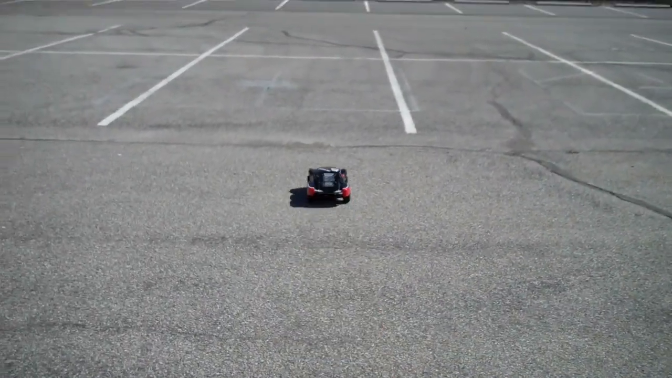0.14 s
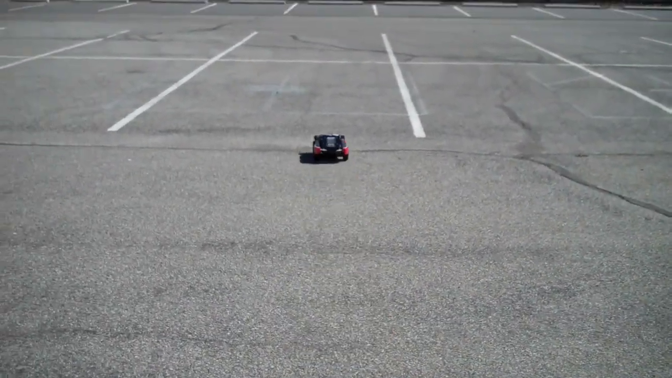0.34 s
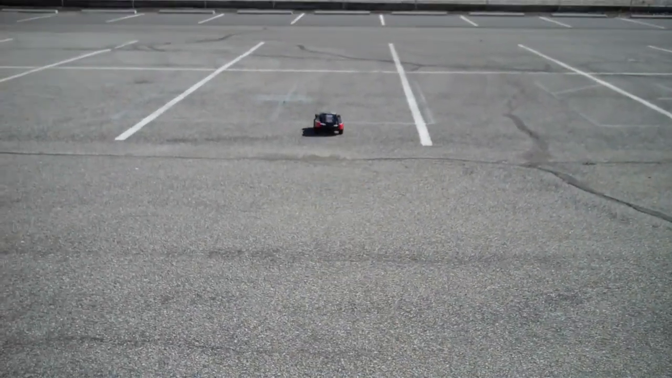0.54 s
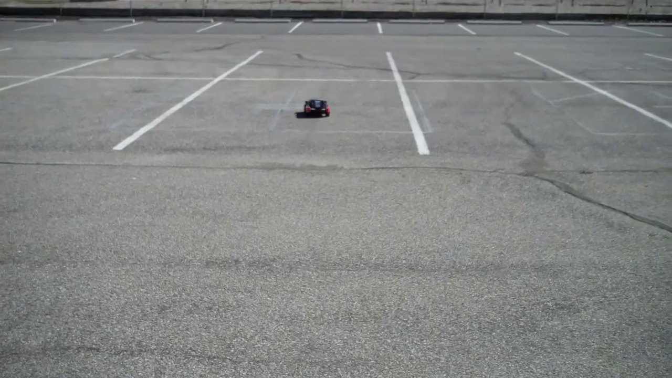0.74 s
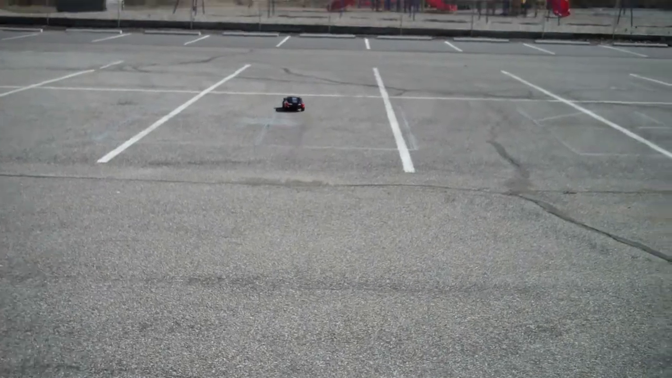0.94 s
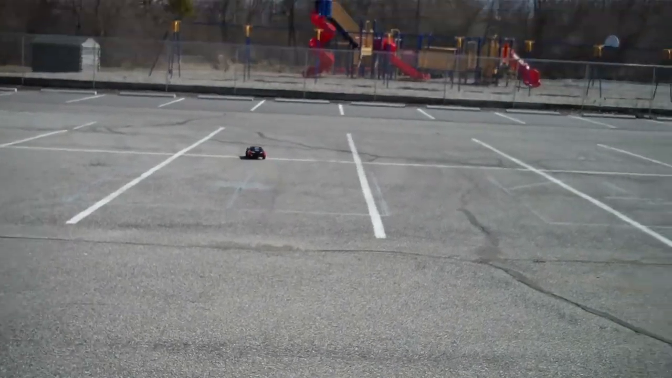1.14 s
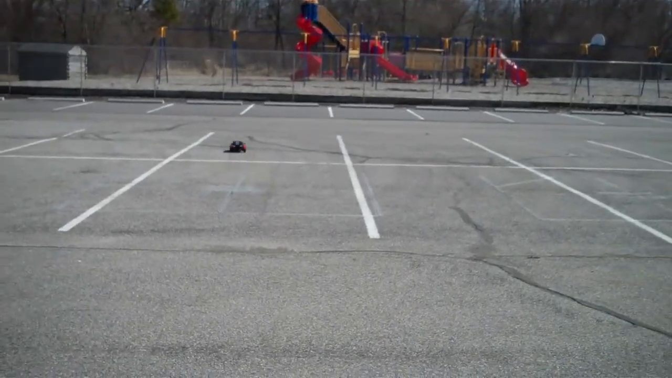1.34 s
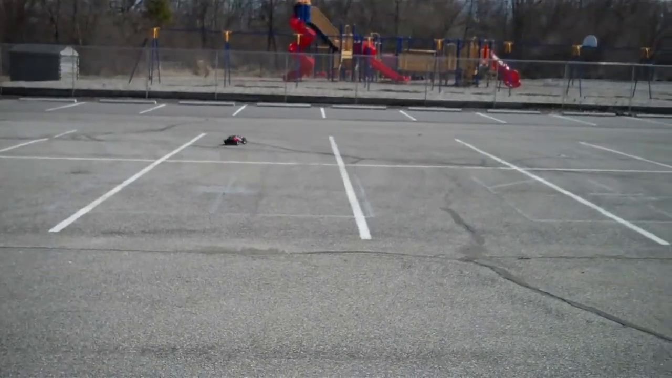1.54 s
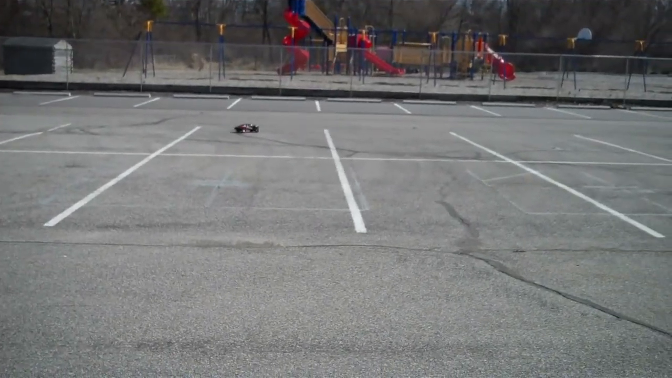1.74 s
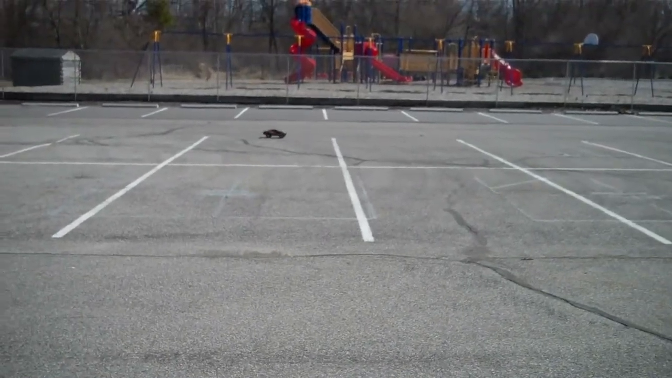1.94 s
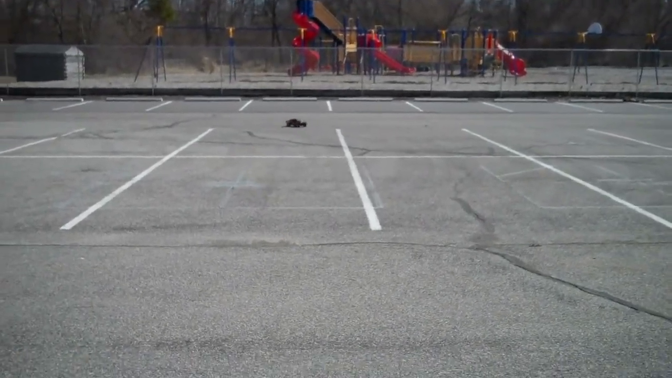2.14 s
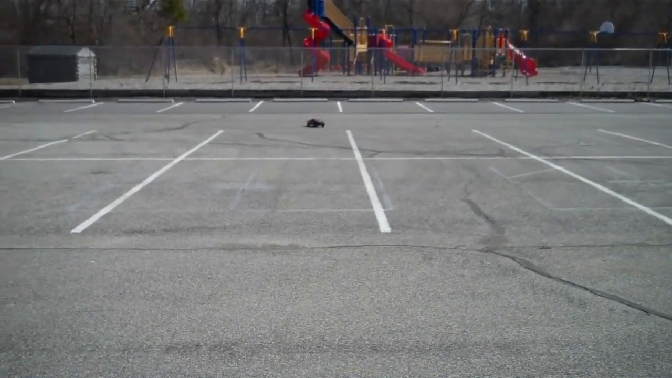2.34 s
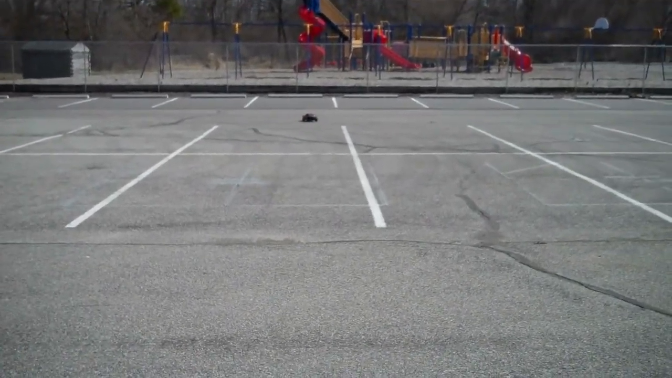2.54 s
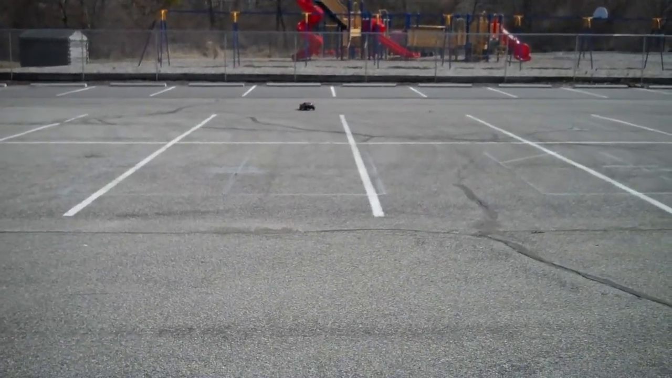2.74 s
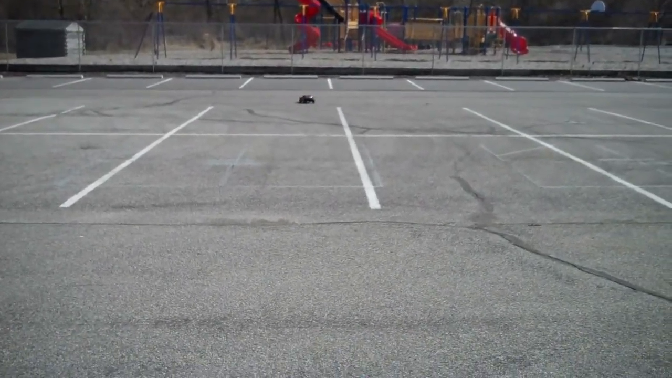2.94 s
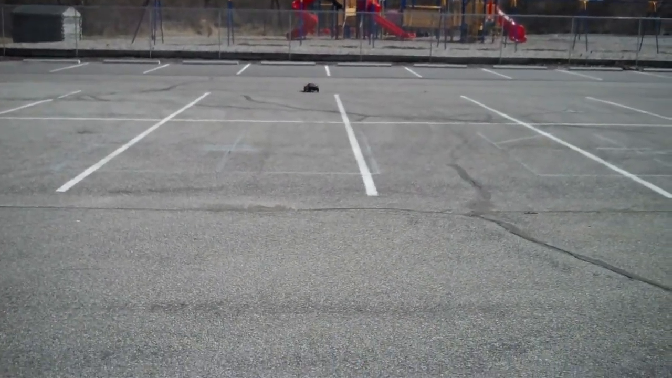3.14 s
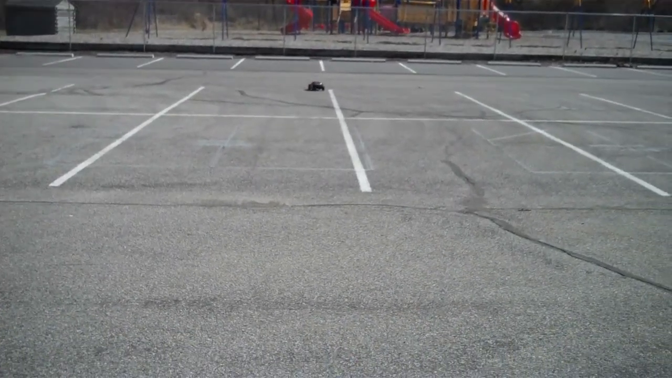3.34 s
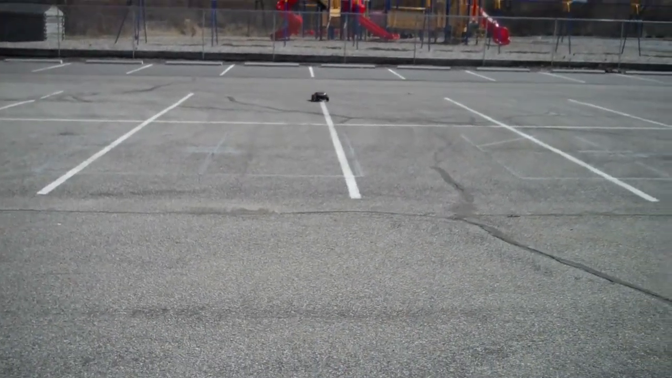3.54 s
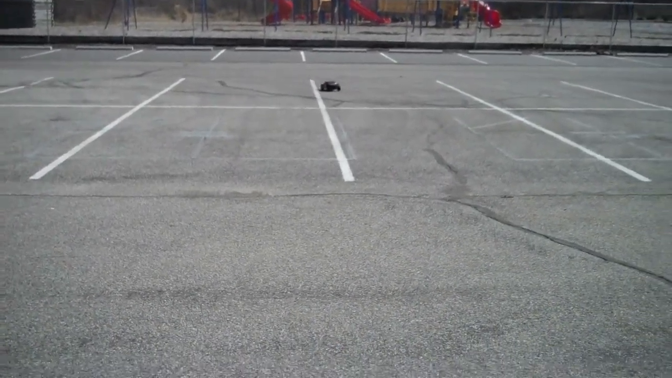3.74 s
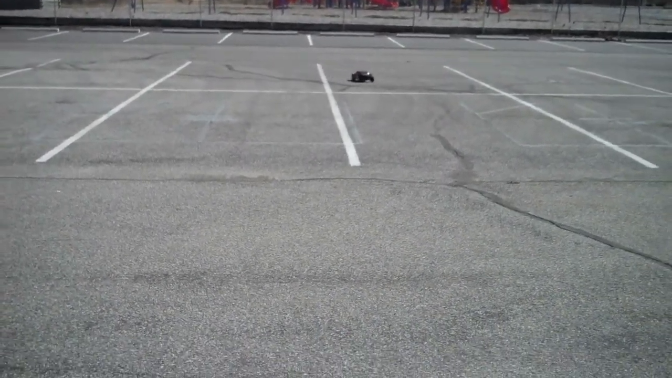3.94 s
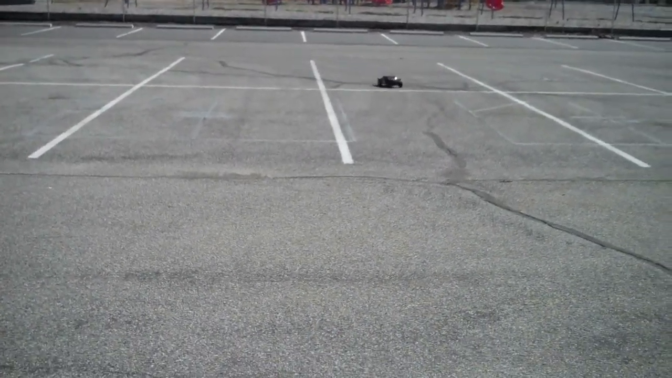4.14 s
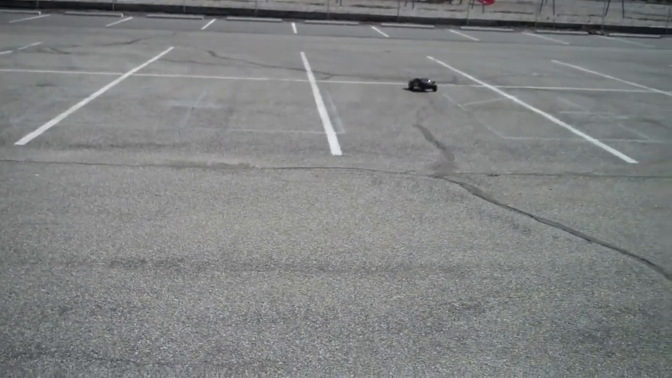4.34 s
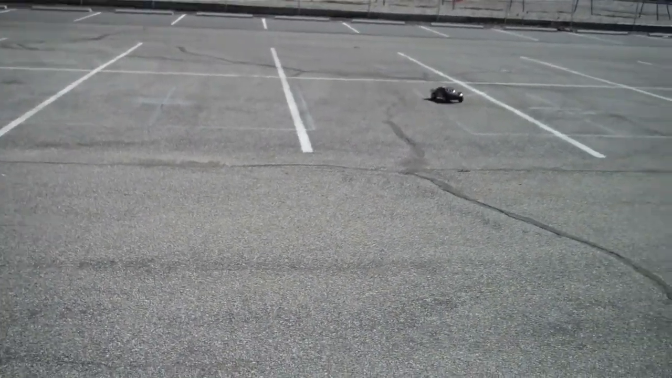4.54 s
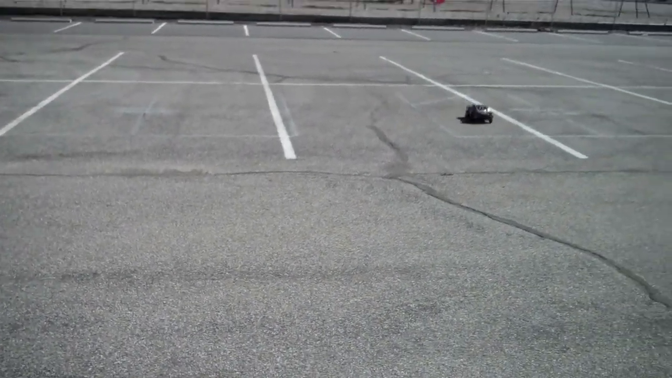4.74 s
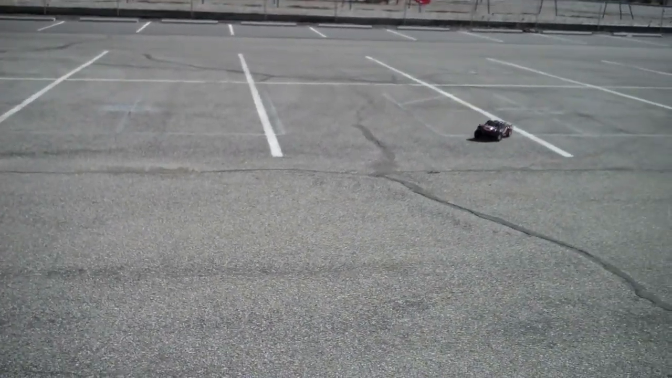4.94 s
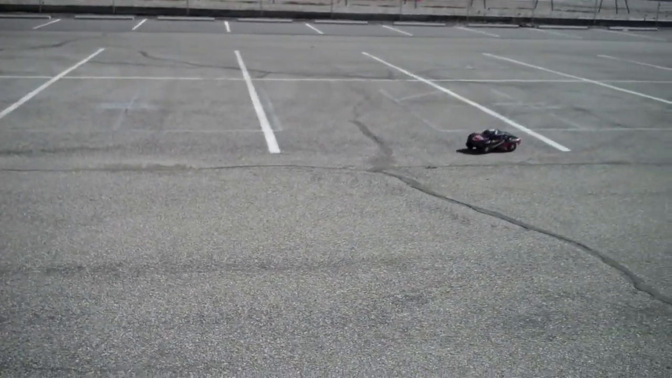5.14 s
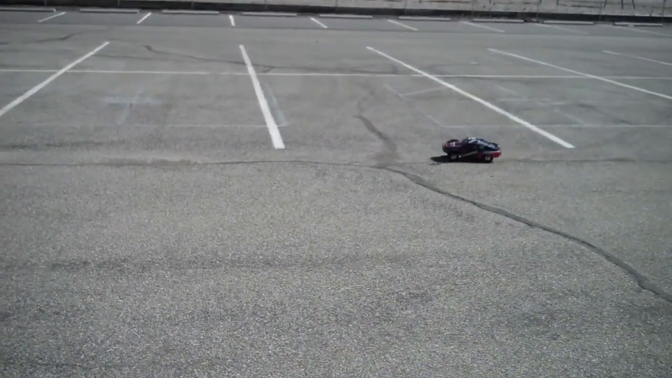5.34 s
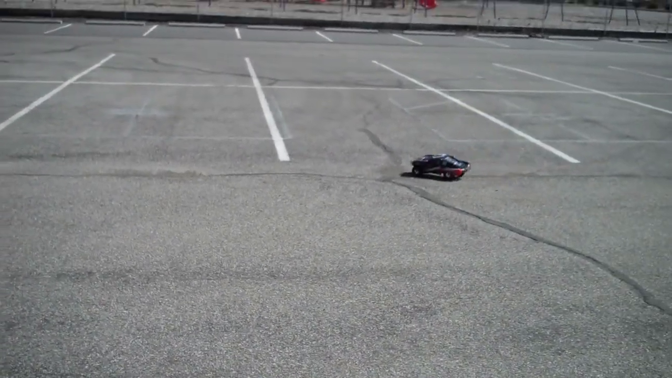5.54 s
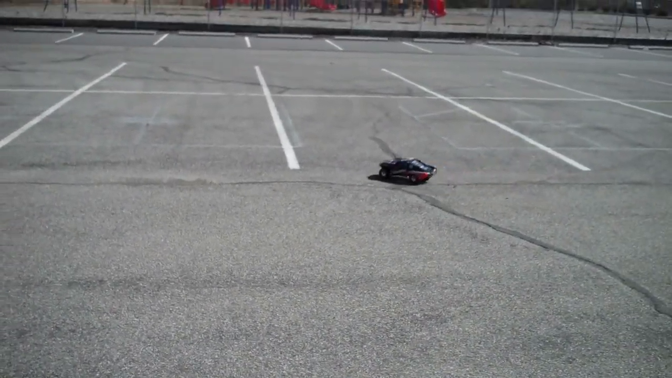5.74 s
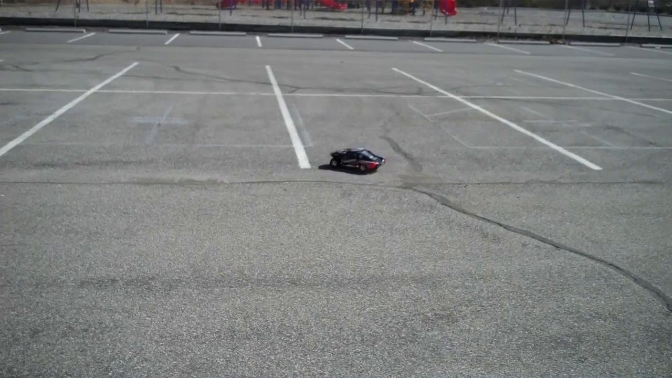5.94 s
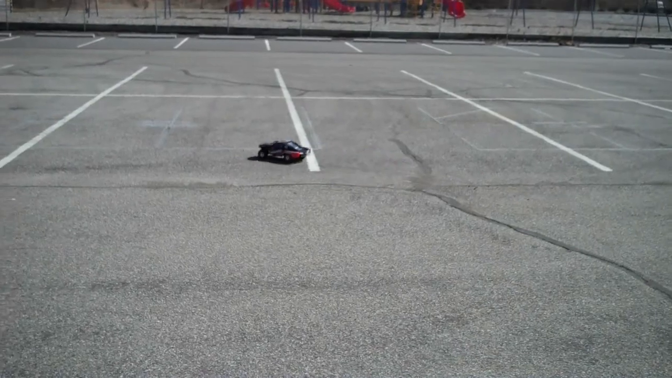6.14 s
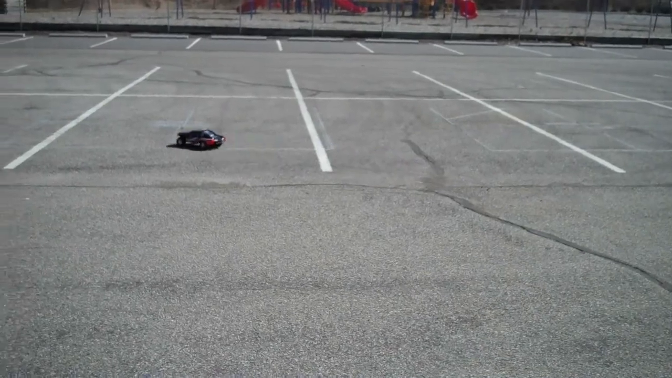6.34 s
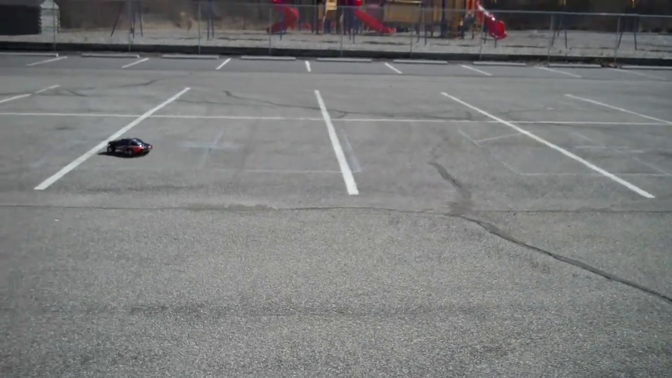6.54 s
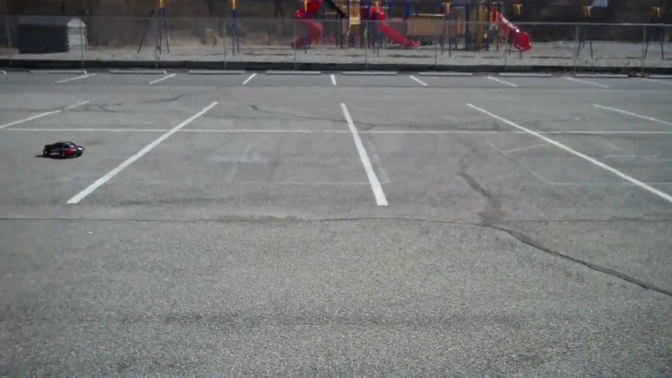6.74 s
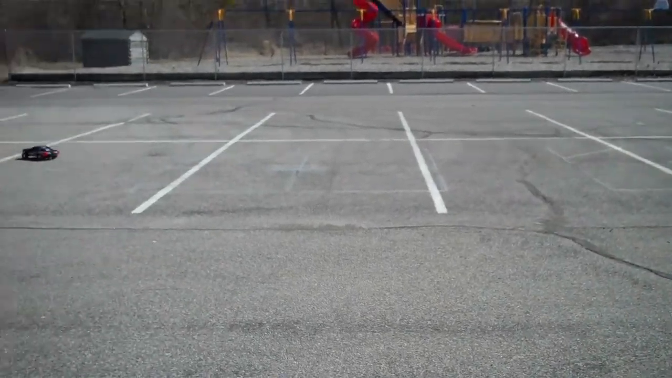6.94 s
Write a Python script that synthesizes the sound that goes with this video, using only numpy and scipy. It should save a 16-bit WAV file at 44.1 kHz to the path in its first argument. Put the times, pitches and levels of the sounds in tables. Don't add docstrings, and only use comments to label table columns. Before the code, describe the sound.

A toy-sized electric truck gives three bursts of throttle: a bright, strong whine leaving, a distant one slowly climbing, and a stuttering one that smooths and rises. Between them the motor is silent, leaving grainy tyre scrub, a buzzing plastic shell and stones cracking against it. Open paved lot, faint traffic hum and soft wind; a hand-held camera's microphones, duller and quieter on the right.

```python
import sys
import numpy as np
from scipy import signal
from scipy.fft import rfft, irfft, next_fast_len
from scipy.io import wavfile

SR = 44100
rng = np.random.default_rng(int(sys.argv[2]) if len(sys.argv) > 2 else 0)


def elevation(decibels):
    levels = np.asarray(decibels, float)
    return 10 ** (levels / 20)


def generate_wav(sig):
    pcm = np.round(np.clip(np.atleast_2d(sig).T, -1, 1) * 32767).astype(np.int16)
    wavfile.write(sys.argv[1], SR, pcm)


N = 307818


def rms_one(x):
    return x / np.sqrt(np.mean(np.abs(x) ** 2) + 1e-20)


def in_time(rows):
    s, *columns = np.transpose(rows)
    return [np.interp(np.arange(N) / SR, s, c) for c in columns]


def at_hz(points, hz):
    f, v = np.transpose(points)
    return np.interp(np.log(hz + 1), np.log(f + 1), v)


def drift(rate_hz):
    r = np.exp(-16 * np.pi * rate_hz / SR)
    noise = rng.standard_normal(N // 8 + 4002)
    slow = signal.lfilter([1], [1, -2 * r, r * r], noise)[4000:]
    return np.interp(np.arange(N) / 8, np.arange(len(slow)), rms_one(slow))


def swell(s, length, fade):
    t = np.arange(N) / SR
    return np.clip(np.minimum(t - s, s + length - t) / fade, 0, 1)


def band_pass(x, order, band_hz):
    return signal.sosfilt(signal.butter(order, band_hz, "band", fs=SR, output="sos"), x)


def ring(x, hz, t60):
    r, w = elevation(-60 / (t60 * SR)), 2 * np.pi * hz / SR
    return signal.lfilter([0, np.sin(w)], [1, -2 * r * np.cos(w), r * r], x)


def add(out, s, sound):
    i = round(s * SR)
    out[..., i:i + sound.shape[-1]] += sound[..., :N - i]


# pitch_hz, likeness (0 to 1)
LIKENESS = [(60, 0.23), (130, 0.39), (290, 0.83), (630, 0.95), (1390, 0.83), (3060, 0.78), (6710, 0.73),
            (14700, 0.01)]


def textured(spectrum, grain_db, patchy_db):
    size = next_fast_len(N)
    hz = np.arange(size // 2 + 1) * SR / size
    grains = elevation(grain_db * np.minimum(rng.exponential(1, N), 6) + grain_db * drift(133))
    mid, side = rfft(rng.standard_normal((2, N)) * grains, size)
    colour = elevation(at_hz(spectrum, hz)) * (hz < spectrum[-1][0])
    alike = np.clip(at_hz(LIKENESS, hz) - 0.043 * (hz < 420) + 0.057, 0, 1)
    pair = colour * (np.sqrt(1 + alike) * mid + np.sqrt(1 - alike) * side * [[1], [-1]])
    together = drift(13.3) + 0.16 * drift(37.0)
    centres = np.linspace(np.log(spectrum[0][0]), np.log(spectrum[-1][0]), 6)
    out = 0
    for c in centres:
        band = np.clip(1 - abs(np.log(hz + 1) - c) / (centres[1] - centres[0]), 0, 1)
        patches = elevation(patchy_db * (0.5 * together + drift(14)))
        out = out + irfft(pair * band, size)[:, :N] * patches
    return rms_one(out)


def hum(band_hz, db):
    mid, side = band_pass(rng.standard_normal((2, N)), 2, band_hz)
    return elevation(db) * rms_one(mid + 0.062 * side * [[1], [-1]])


def far_traffic():
    return hum([135, 200], -53)


# time_s, level_db
WIND = [(0.0, -43.5), (0.8, -53.5), (2.0, -52), (2.51, -48), (3.5, -47.5), (4.0, -51.5), (4.14, -41),
        (4.24, -48), (4.31, -39.5), (4.61, -45.5), (4.67, -38.5), (4.88, -47), (4.92, -41), (5.03, -47.5),
        (6.69, -50.5), (6.73, -39), (6.86, -47), (6.98, -44)]
# pitch_hz, level_db (per Hz)
BREEZE = [(20, -42), (40, -20), (70, -4), (140, -2), (200, -4), (330, -5), (480, -7), (750, -9)]
# start_s, peak_db, pitch_hz, left_over_right_db
BUMPS = [(2.201, -14, 180, 2), (2.51, -16, 170, -18), (2.56, -19, 200, -19), (2.795, -21, 170, -17),
         (2.884, -22, 188, -15), (5.36, -22, 90, 7), (5.5, -24, 80, -2), (2.69, -11, 233, -24),
         (2.97, -31, 95.7, -39), (3.132, -18, 189, -17), (4.139, -16.5, 114, -20), (4.29, -19, 175.8, 27),
         (4.344, -13.5, 131.7, -23), (4.658, -14.5, 158, -25), (4.709, -22, 78.1, 13),
         (4.906, -23.5, 82, 19), (6.725, -14.5, 164, 27), (6.745, -13.5, 222, 21)]


def wind():
    out = elevation(in_time(WIND)[0] + 1.0) * textured(BREEZE, grain_db=-1.5, patchy_db=2.5)
    for s, db, hz, pan_db in BUMPS:
        t = np.arange(round(1.73 / hz * SR)) / SR
        bump = np.sin(np.pi * t / t[-1]) ** 2 * np.cos(2 * np.pi * hz * (t - t[-1] / 2))
        sides_db = pan_db / 2 * np.array([[1], [-1]])
        add(out, s, elevation(db - 15.5 + sides_db) * bump)
    return out


def tyre_rumble(near_db):
    return hum([269, 373], near_db - 22.5)


# pitch_hz, level_db (per Hz)
SCRUB = [(350, -9.5), (520, -7), (700, 4), (900, 1), (1150, -3), (1420, -3), (1800, -0.5), (2400, -12.5),
         (3500, -37)]


def tyre_scrub(level_db):
    return elevation(level_db - 3.5) * textured(SCRUB, grain_db=1.0, patchy_db=1.26)


def tread_chatter(level_db):
    slips_per_s = 1100 * elevation(3 * drift(30))
    slips = (rng.random(N) < slips_per_s / SR) * rng.standard_normal(N)
    return elevation(level_db - 9) * rms_one(band_pass(slips + 1e-18, 3, [740, 1500]))


# start_s, peak_db, pitch_hz
GRIT = [(0.5286, -11.5, 1440), (0.529, -19, 3300), (0.616, -9, 6000), (0.9783, -11.5, 7100),
        (1.262, -24, 6000), (1.303, -19, 6500), (1.455, -30, 4500), (1.5, -30, 7000), (1.5567, -21, 3960),
        (1.654, -31, 1810), (1.728, -23, 5630), (1.7717, -14, 2960), (1.826, -22, 1800),
        (1.771, -16.5, 6500), (1.879, -22, 2100), (1.881, -18, 6640), (1.9764, -21, 4530),
        (2.053, -2.5, 7100), (2.0612, -17, 5300), (2.069, -13, 5530), (2.078, -17, 5200),
        (2.254, -31, 5500), (2.262, -28, 6200), (2.287, -28, 6500), (2.37, -29, 6000), (2.4426, -32, 2520),
        (2.499, -35, 5050), (2.694, -35.5, 4800), (2.7054, -35, 7240), (2.714, -41, 7200),
        (2.75, -31, 1530), (2.7502, -37, 5160), (2.783, -34, 6000), (2.786, -25, 7650), (2.812, -38, 6450),
        (2.8238, -31, 6540), (2.8649, -28.5, 7000), (2.875, -38, 6500), (4.467, -12, 6040),
        (4.631, -23, 6330), (4.672, -23, 5070), (4.675, -24, 5070), (4.718, -21, 6840), (4.844, -22, 2950),
        (4.895, -31, 2690), (4.933, -18.5, 2680), (5.017, -22, 2720), (5.019, -18, 5500),
        (5.124, -13, 6940), (5.1323, -5, 7160), (5.129, -16, 2980), (5.1395, -12, 5000), (5.293, -30, 1760),
        (5.516, -20, 1510), (5.564, -31, 2020)]


def grit():
    out, t = np.zeros(N), np.arange(1536) / SR
    shell_hz = [3900, 8300]
    dull = signal.butter(6, 8700, fs=SR, output="sos")
    decay = (elevation(-60 * t / 0.007) + 0.14 * elevation(-60 * t / 0.05)) * np.minimum(t / 0.0004, 1)
    for (s, db, hz), noise in zip(GRIT, rng.standard_normal((len(GRIT), len(t)))):
        bright = min(hz / 5000, 1) ** 2
        crack = noise * decay
        knock = band_pass(crack, 2, [hz / (1.8 - .62 * bright), hz * (1.5 - .25 * bright)])
        rattle = rms_one(band_pass(crack, 3, shell_hz))
        body = signal.sosfilt(dull, rms_one(knock) + 0.45 * bright * rattle)
        body += bright * rms_one(band_pass(ring(crack, 7140, 0.0077), 3, shell_hz))
        snap = rms_one(np.diff(noise, prepend=0) * elevation(-60 * t / 0.003))
        body += 0.12 * bright * elevation(db + 13) * snap
        add(out, s, elevation(db + 4.5) * body / abs(body).max())
    return out


# pitch_hz, level_db (per Hz)
SHELL = [(3800, -15), (4800, -14.5), (6200, -7), (7100, -2), (8100, -7.5), (8800, -15), (10500, -21.5),
         (12500, -29.5), (14400, -37)]


def shell_rattle(near_db):
    return elevation(near_db + 1.0) * textured(SHELL, grain_db=1.5, patchy_db=2.5)


# pitch_hz, width_hz
CHASSIS_MODES = [(2760, 190), (3780, 90), (5300, 400), (7250, 520), (3390, 130), (3560, 200), (2570, 90),
                 (900, 260)]
MODE_DB = [-14.5, -36, -16, -14.5, -32, -32, -34, -30]
# start_s, length_s, rise_db
FLARES = [
    [(.6, 0.37, 2.5), (1.72, 0.15, 10.5), (4.3, 0.23, 11), (4.83, 0.28, 8), (5.85, 0.43, -12)],
    [(0.9, 0.3, 17), (5.64, .36, 27), (5.96, 0.56, 26), (0, .25, 18)],
    [(.05, 0.48, 8.5), (.6, 0.44, 10), (3.45, 1.05, 8), (3.58, 0.25, 6), (4.17, .15, 4), (6.84, 0.18, 11),
     (6.4, .35, 7)],
    [(.6, 0.36, 7), (1.25, 0.74, 5.5), (3.9, .65, 14), (3.4, .4, 12), (4.7, 0.19, 10), (6.4, .5, 5)],
    [(3.74, .36, 29), (.22, .2, 18)],
    [(6.47, .29, 30), (4.12, .42, 22)],
    [(1.53, .22, 26), (2.25, .15, 22)],
    [(4.88, .6, 23), (5.1, .3, 4), (1.6, .4, 24), (1.95, .4, 31), (5.8, .12, 18)],
]


def chassis(near_db):
    out = 0
    for (hz, width), db, flares in zip(CHASSIS_MODES, MODE_DB, FLARES):
        knocks = rng.standard_normal(N) * elevation(2.5 * drift(25))
        t60 = np.log(1000) / (np.pi * width)
        flare_db = sum(rise_db * swell(s, length, 0.044) for s, length, rise_db in flares)
        ringing = ring(ring(knocks, hz, t60), hz, t60 / 2)
        out = out + elevation(near_db + db + flare_db) * rms_one(ringing)
    return out


# start_s, length_s, start_hz, end_hz, level_db
SERVO = [
    (-.1, .83, 11920, 11770, -47),
    (2.9, .9, 12050, 12230, -67),
    (3.75, .75, 12230, 12310, -61),
    (5.57, .4, 12100, 12030, -52),
    (5.92, .78, 12030, 11870, -53),
]


def speed_controller():
    t, level = np.arange(N) / SR, 0
    s, length, start_hz, end_hz, db = np.transpose(SERVO)
    times = np.ravel([s, s + length - .06], "F")
    hz = 6 * drift(20) + np.interp(t, times, np.ravel([start_hz, end_hz], "F"))
    for row in SERVO:
        level = np.maximum(level, swell(row[0], row[1], 0.05) * elevation(row[-1]))
    return level * elevation(3 * drift(16)) * np.sin(2 * np.pi * np.cumsum(hz) / SR)


# pitch_hz, level_db (per Hz)
GEARBOX = [(1200, -9), (2000, 0.5), (2600, 3.5), (3800, 2.5), (4600, -2), (6000, -7)]


def gearbox_noise(level_db):
    return elevation(level_db - 3.0) * textured(GEARBOX, grain_db=1.2, patchy_db=1.3)


# start_s, peak_db, pitch_hz
SQUEAKS = [(0.066, -1, 3290), (0.08, -8, 2920), (0.262, -14, 2050), (0.53, -6, 3660), (0.584, -2, 3680),
           (0.596, -1, 3630), (2.642, -23, 2060), (2.99, -22, 3930), (3.07, -13, 4080), (5.667, -6.5, 3820),
           (5.672, -11, 2600), (5.686, -7, 2810), (5.709, -7.5, 3750), (5.748, -6, 3760),
           (5.837, -13, 3770), (5.857, -15, 3800), (5.937, -15, 3800), (6.03, -8.5, 3850),
           (6.05, -11, 3820), (6.109, -6, 3820), (6.13, -12, 3800), (6.149, -12, 3770), (6.276, -9, 3660),
           (6.314, -9, 3690)]


def squeaks():
    out, t = np.zeros(N), np.arange(round(0.015 * SR)) / SR
    for s, db, hz in SQUEAKS:
        add(out, s, elevation(db - 18.0) * np.sin(np.pi * t / t[-1]) ** 1.2 * np.sin(2 * np.pi * hz * t))
    return out


# time_s, gear_whine_db, rotor_hum_db (against the gear whine)
DEPARTURE = [(0.0, -20.5, -11), (0.07, -28, -4), (0.15, -23, 0), (0.26, -20, -12.5), (0.35, -15.5, -14),
             (0.445, -19, -6), (0.49, -19, -22), (0.54, -18.5, -5), (0.585, -27, -9), (0.64, -20.5, -16),
             (0.69, -35, -2), (0.77, -29, -6), (0.88, -27.5, -11), (1.0, -35, -1), (1.08, -47, 3)]
RETURN = [(2.855, -47, -12), (2.88, -46, -12), (2.91, -42, -12), (2.93, -45, -12), (2.955, -35, -15),
          (2.995, -32.5, -17), (3.024, -37.5, -8), (3.09, -42, -2), (3.119, -36.5, -2), (3.17, -44, 1),
          (3.21, -39.5, 6), (3.27, -39.5, -13), (3.35, -37.5, -6), (3.38, -48, -3), (3.411, -42.5, -2),
          (3.57, -34.5, -8.5), (3.72, -31, -5), (3.81, -29, -4.5), (4.04, -27.5, -9.5), (4.12, -36, 1),
          (4.29, -33, -3), (4.45, -33, 1), (4.55, -47, 9)]
CROSSING = [(5.73, -46, 2), (5.765, -37, -6), (5.805, -36, -6), (5.825, -31, -8), (5.865, -27, -9),
            (5.905, -29, -5), (5.94, -25, -2), (5.965, -32, 7), (6.01, -33, 8), (6.04, -31, -6),
            (6.1, -27, -10), (6.135, -30, -10), (6.17, -27, -3), (6.225, -27, 0), (6.25, -35, 8),
            (6.29, -27, 7), (6.36, -25, 6), (6.43, -26, 3), (6.55, -25, -1), (6.65, -30, 3), (6.74, -36, 8),
            (6.8, -42, 12), (6.85, -44, -2), (6.98, -41, -4)]
# time_s, speed_turns_per_s
SPEED = [(0, 690), (.07, 722), (.15, 765), (.26, 800), (.34, 835), (.45, 872), (.5, 915), (.56, 955),
         (.63, 945), (.77, 962), (.9, 985), (1.08, 1010), (2.855, 440), (2.91, 440), (2.955, 410),
         (2.995, 425), (3.024, 515), (3.085, 535), (3.125, 600), (3.21, 522), (3.27, 565), (3.35, 583),
         (3.41, 605), (3.6, 716), (3.8, 772), (4.05, 832), (4.15, 860), (4.3, 900), (4.4, 916), (4.55, 925),
         (5.73, 420), (5.765, 495), (5.805, 515), (5.825, 595), (5.865, 630), (5.905, 608), (5.94, 630),
         (5.965, 722), (6.01, 715), (6.04, 655), (6.1, 672), (6.135, 635), (6.17, 672), (6.225, 680),
         (6.29, 728), (6.35, 760), (6.43, 810), (6.55, 855), (6.72, 918), (6.85, 955), (6.98, 990)]
TEETH_RATIO = 4.15
# multiple_of_rotor_speed, rough_share (0 to 1), smear_hz
ORDER_GRAIN = [(1, .33, 18), (2, .55, 30), (3, .55, 36), (TEETH_RATIO, .4, 100),
               (2 * TEETH_RATIO, .85, 240), (3 * TEETH_RATIO, .95, 400)]
# pitch_hz, level_db
CAN = [(450, -28), (640, -3), (750, -3.5), (970, -12.5), (1500, -18.5), (1900, -9.5), (2200, -13),
       (2550, -11.5), (2950, -2)]
# pitch_hz, level_db
GEAR = [(1800, -2.5), (2700, -4), (3450, -7), (3800, -9), (4400, 3), (5800, -21), (7300, -3), (8500, -1.5)]
# time_s, second_db, third_db
OVERTONES = [(0, -35, -47), (.15, -46, -40), (.3, -35, -34), (.43, -39, -27.5), (.5, -39, -38),
             (.56, -39, -34), (.6, -40, -43), (.66, -37, -34), (.8, -43, -33), (1.05, -49, -39),
             (2.9, -57, -54), (3.6, -54, -51), (3.9, -50, -63), (4.1, -45, -42), (4.22, -44, -40),
             (4.28, -52, -50), (4.39, -41, -35), (4.55, -54, -54), (5.75, -50, -50), (6.2, -58, -41),
             (6.31, -48, -32.5), (6.4, -41.5, -47), (6.7, -47, -43), (6.8, -43, -46), (6.9, -43, -43),
             (6.98, -33, -42)]


def motor():
    rows = []
    for b in (DEPARTURE, RETURN, CROSSING):
        rows += [(b[0][0] - .03, -90, 0), *b, (b[-1][0] + .03, -90, 0)]
    speed, = in_time(SPEED)
    mesh_db, rotor_db = in_time(rows)
    overtone_db = in_time(OVERTONES)
    cogging = np.clip((730 - speed) / 200, 0, 1)
    turns = np.cumsum(speed * (1 + .003 * drift(15) + cogging * .006 * drift(25))) / SR
    blur = np.clip(np.minimum(speed - 755, 960 + 50 - speed) / 50, 0, 1)
    stumble = elevation(cogging * 3.5 * drift(30))
    runout = stumble * np.exp((.35j + .45j * blur) * np.sin(2 * np.pi * .19 * turns))
    out = 0
    for multiple, rough, smear_hz in ORDER_GRAIN:
        gear = multiple >= TEETH_RATIO
        hz = multiple * speed
        if multiple in (2, 3):
            db = overtone_db[multiple - 2] + np.minimum(mesh_db + 50, 0)
            db = db + 1.5 * drift(6.0)
        else:
            db = at_hz(GEAR, hz) if gear else at_hz(CAN, hz) + rotor_db
            db = db + mesh_db + 1.5 * drift(3.0) - 27 * (multiple == 3 * TEETH_RATIO)
        db = db - 8 * cogging * (multiple > TEETH_RATIO)
        rough = rough + gear * (.6 - rough) * blur * (rough < .6)
        smear = drift(smear_hz) + 1j * drift(smear_hz)
        wobble = np.sqrt(1 - rough) + np.sqrt(rough / 2) * smear
        wobble = wobble * runout if gear else wobble
        out = out + elevation(db) * np.sqrt(2) * np.imag(wobble * np.exp(2j * np.pi * multiple * turns))
    return out


# time_s, nearness_db (as shell rattle), tyre_slip_db, gear_load_db
ROLL = [(0.0, -21, -4.5, 0), (0.65, -22.5, -12, 0), (1.05, -30.5, -5, 1), (1.5, -32, -4.5, 2.5),
        (1.62, -32.5, 2, 4.5), (1.75, -27.5, 0, -2), (1.9, -35, 5, 1.5), (2.05, -41, 9.5, 2),
        (2.22, -42, 10.5, 4), (2.4, -44, 7, 5.5), (2.62, -55.5, 7.5, 2.5), (2.98, -42.5, 3.5, 2),
        (3.36, -41, -1, 4), (3.8, -38, -2, 8.5), (4.46, -34.5, -1.5, 7), (4.62, -36, -2.5, 3),
        (5.0, -31, 3.5, 0), (5.32, -34, 10, 2), (5.5, -32.5, 3, -1.5), (5.6, -41, 8, 7.5),
        (5.85, -27.5, 2, 4.5), (6.1, -30.5, 0, 0.5), (6.5, -29.5, -2, 5), (6.8, -31, -4.5, 1.5),
        (6.98, -26.5, -7.5, 0.5)]


def scene():
    near_db, slip_db, load_db = in_time(ROLL)
    background = wind() + far_traffic()
    rolling = tyre_scrub(near_db + slip_db) + tyre_rumble(near_db)
    rolling += gearbox_noise(near_db + load_db) + shell_rattle(near_db)
    works = tread_chatter(near_db + slip_db) + grit() + chassis(near_db)
    works += speed_controller() + squeaks() + motor()
    return background + rolling + elevation(1.05) * works


# pitch_hz, loss_db
RIGHT_LOSS = [(60, 2.5), (400, 4), (2400, 3), (4300, 2.5), (5800, -1), (6800, 11.5), (8000, 16),
              (14000, 36)]
# pitch_hz, lag_radians
RIGHT_LAG = [(0, 0), (4570, -.4), (5680, -.1), (6720, 1.1), (7490, -.1), (8610, -1), (12100, -2.2)]


def right_shade(hz):
    return elevation(-at_hz(RIGHT_LOSS, hz)) * np.exp(-1j * np.interp(hz, *np.transpose(RIGHT_LAG)))


def roll_off(x):
    return signal.sosfilt(signal.butter(12, 15330, fs=SR, output="sos"), x)


def record(dry):
    size = next_fast_len(N)
    hz = np.arange(size // 2 + 1) * SR / size
    top = elevation(-22 / (1 + np.exp((14280 - hz) / 40)))
    hiss = elevation(-71) * rms_one(band_pass(rng.standard_normal((2, N)), 2, [9500, 14400]))
    pair = irfft(rfft(dry + hiss, size) * [top, top * right_shade(hz)], size)[:, :N]
    return roll_off(np.clip(pair, -1, 1))


dry = scene()
out = record(dry)
generate_wav(out)
```